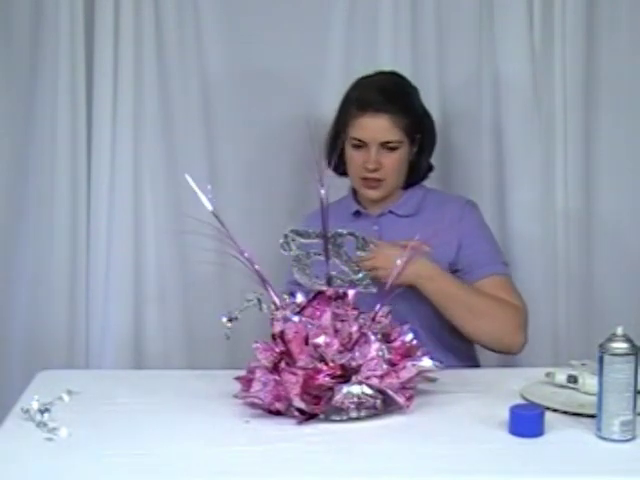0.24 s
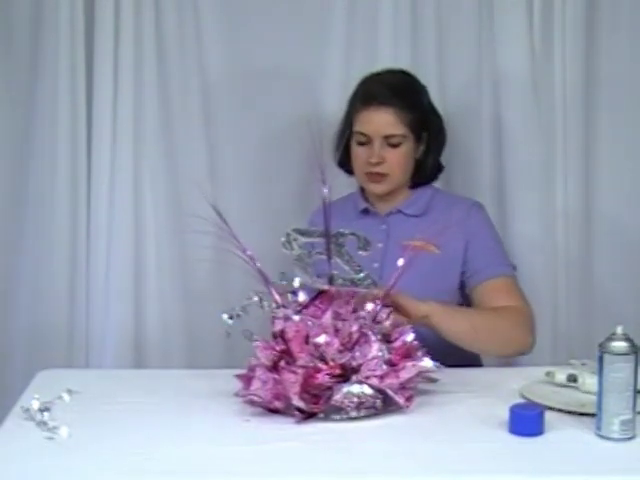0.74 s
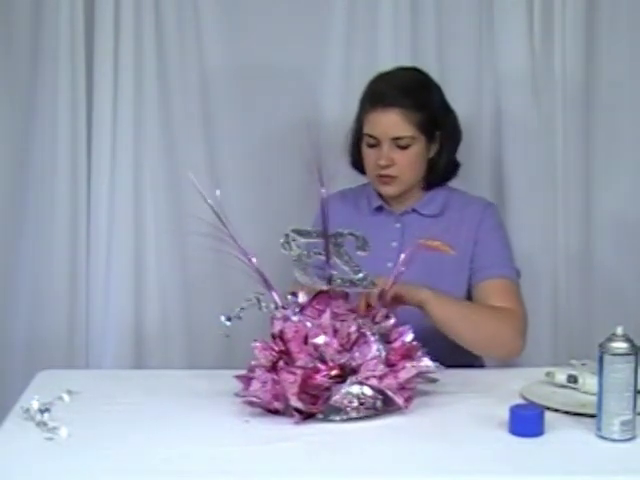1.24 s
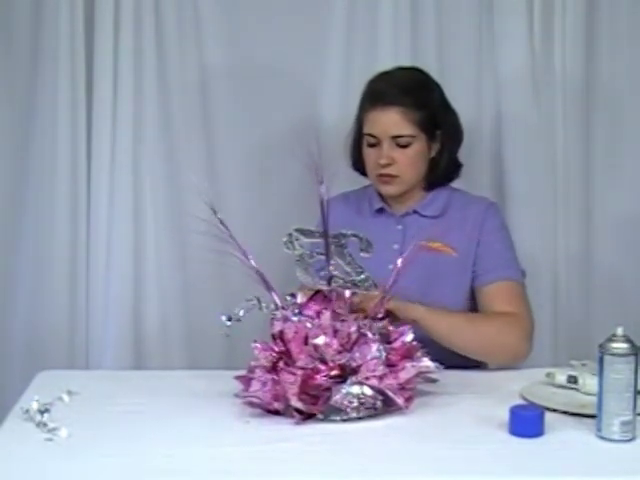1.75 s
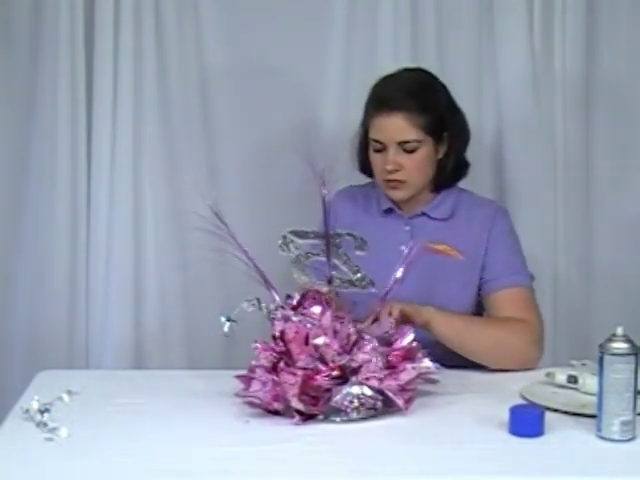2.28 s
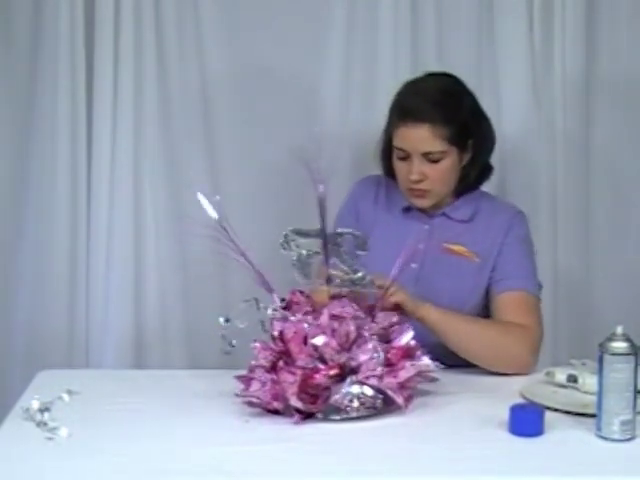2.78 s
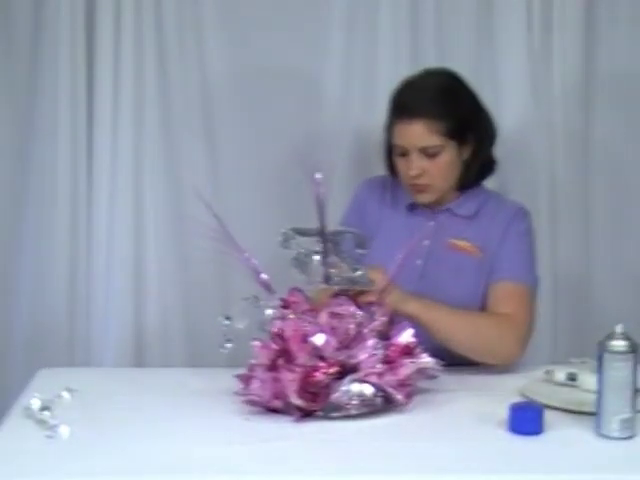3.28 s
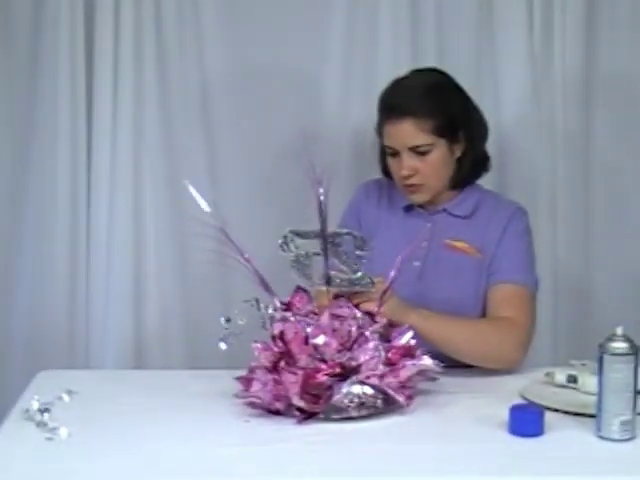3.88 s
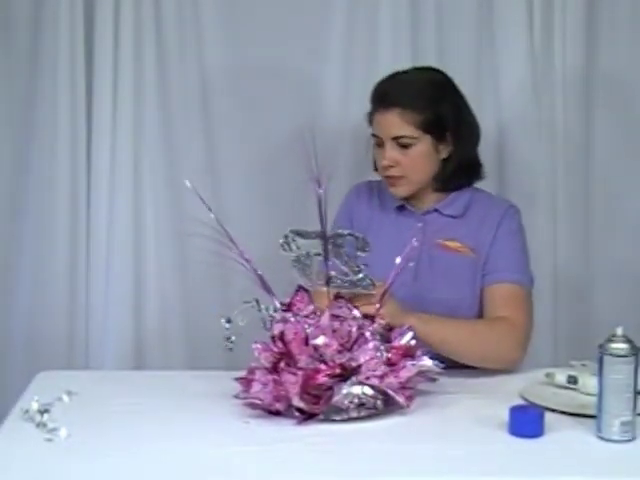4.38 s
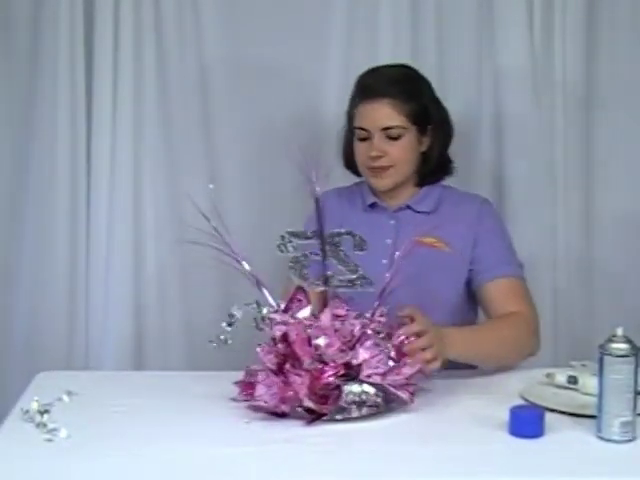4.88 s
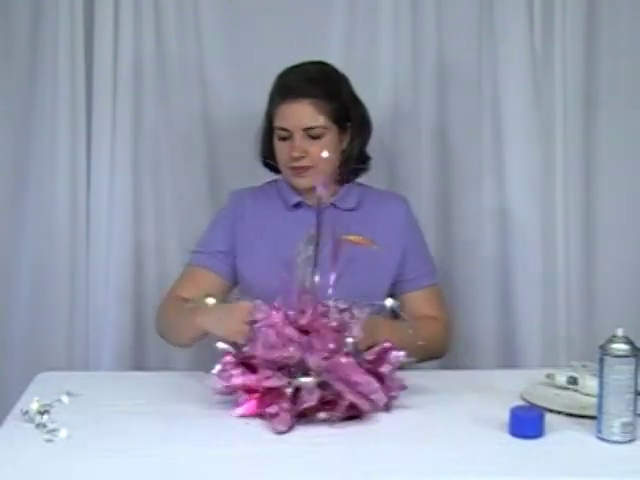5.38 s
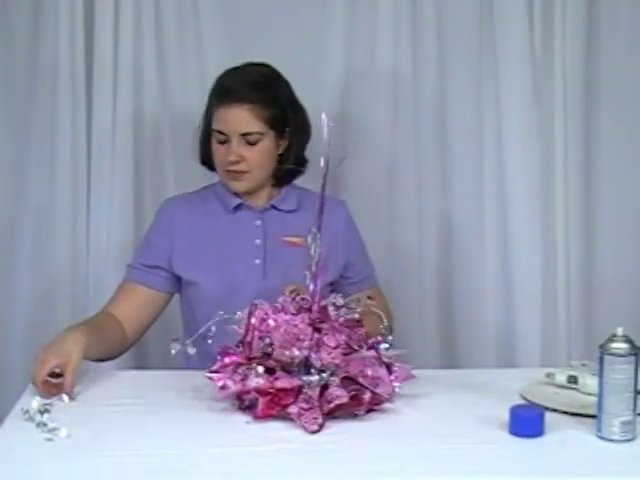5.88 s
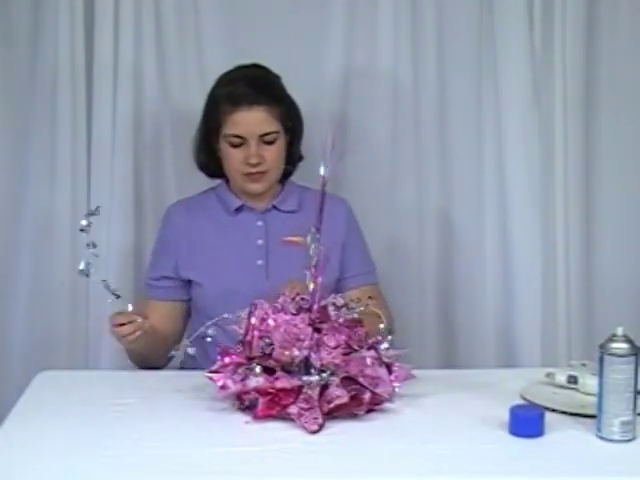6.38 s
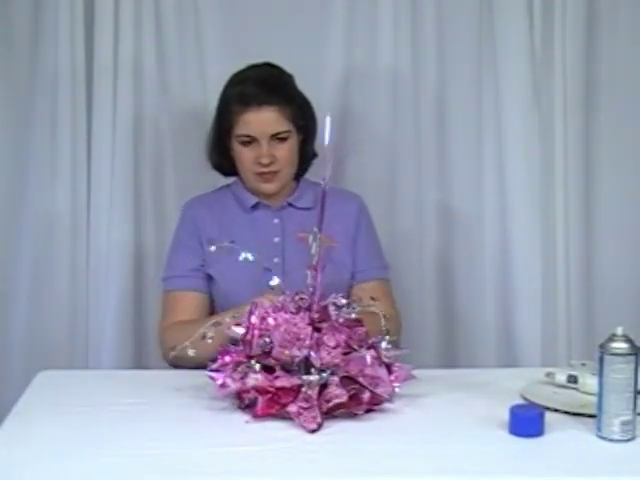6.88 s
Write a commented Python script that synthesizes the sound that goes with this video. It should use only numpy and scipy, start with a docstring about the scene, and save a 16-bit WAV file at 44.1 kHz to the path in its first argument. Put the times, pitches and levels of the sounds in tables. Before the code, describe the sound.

A small indoor room with low hiss, faint electrical buzz and a weak drone. A few metres from the microphone, stiff metallic foil crinkles almost continuously: fine treble ticks, softer lower crumpling, sudden sharp snaps. A louder snap with a soft table bump comes near four seconds, a thick cluster near five, a soft knock and lull near six, then a piercing snap and more rustle.

```python
"""Crumpled foil crackles on a table, a few metres away in a small room, as hands push tinsel sprigs into it.
Small creases tick in the treble, large ones crumple lower, and sharp snaps stand out: all bursts of noise.
A few taps are short fading notes; knocks are table tones with a dull thud of noise.
Behind it lie room tone, a mains buzz, a faint low drone and, in the side channel, microphone hiss."""
import sys
import numpy as np
from scipy import signal
from scipy.fft import rfft, irfft, next_fast_len
from scipy.io import wavfile
from scipy.ndimage import uniform_filter1d, map_coordinates

SR = 44100
rng = np.random.default_rng(int(sys.argv[2]) if len(sys.argv) > 2 else 0)


def digitize_waveform(pressure):
    """Quantize a signal to 16-bit integers and store it at the path in sys.argv[1].

    Rows of a 2-D input are taken as channels; values are limited to [-1, 1].
    """
    field = np.atleast_2d(pressure).T
    bounded = np.clip(field, -1, 1)
    quanta = np.round(bounded * 32767).astype(np.int16)
    wavfile.write(sys.argv[1], SR, quanta)


N = 314874  # length in samples

# All levels in the tables are relative: later gains shift them.
# Room tone in the mid channel: pitch_hz, level_db (per Hz)
AIR_COLOUR = [(15, -49), (25, -16), (111, -13), (230, -6), (399, -3), (606, -4.5), (995, -5), (1080, -5),
              (1400, -7.5), (3670, -14), (7840, -16), (10700, -21.5), (12900, -24)]
# Microphone hiss in the side channel: pitch_hz, level_db (per Hz)
HISS_COLOUR = [(15, -56), (25, -26), (177, -7.5), (208, -3.5), (518, -2.5), (560, -4), (622, -2.5),
               (2620, -15.5), (5160, -24), (11900, -28), (12900, -45)]
# Overtones of the mains buzz: multiple (of the mains pitch), level_db (rms)
BUZZ_OVERTONES = [(4, -71), (10, -75), (12, -73), (14, -75), (16, -74), (18, -70), (44, -81), (58, -80),
                  (59, -78), (61, -78), (63, -75), (64, -82), (69, -81), (72, -82), (80, -81), (83, -77),
                  (94, -79), (132, -80)]
# Overlapping swells of the crackle; some rows together shape one longer push:
# loudest_s, level_db, rise_s, fade_s, large_db (large creases against small ones)
CRACKLE_SWELLS = [(0.24, -57.5, 0.99, 0.43, -17), (0.589, -38.5, 0.061, 0.04, -10.5),
                  (0.69, -40, 0.12, 0.4, -8), (0.97, -40, 0.27, 0.069, -6), (1.11, -40, 0.18, 0.28, -4.5),
                  (1.51, -43, 0.38, 0.091, -6.5), (1.78, -43, 1, 0.27, -7), (1.91, -38, 0.2, 0.12, -4),
                  (2.09, -38, 0.27, .25, -7), (2.23, -37, 0.087, 0.28, -6.5), (2.39, -40.5, 0.23, 0.49, -7),
                  (2.64, -36.5, 0.23, 0.33, -6), (2.94, -48, 0.015, 0.19, 1),
                  (3.079, -42.5, 0.08, 0.12, -2.5), (3.26, -49, 0.27, 0.17, -4),
                  (3.34, -40, 0.072, 0.45, -4), (3.75, -54, 0.38, 0.27, -1.5),
                  (3.84, -31.5, 0.01, 0.14, -4.5), (4.15, -43.5, 0.14, 0.22, -5.5),
                  (4.37, -39.5, 0.014, 0.48, -7), (4.47, -42.5, 0.18, 0.51, -2.5),
                  (4.51, -40.5, .01, 0.14, -6), (4.95, -34.5, 0.084, 0.6, -9), (5.2, -43.5, .5, 0.77, -2),
                  (5.45, -36, 0.73, 0.18, -6), (5.65, -44.5, 0.23, 0.29, -6), (6.02, -54.5, .02, 0.12, 0.5),
                  (6.22, -62, 0.039, 0.042, -9), (6.47, -42, 0.058, 0.16, -9), (6.52, -41, 0.039, 0.12, -8),
                  (6.66, -42.5, 0.18, 0.3, -4.5), (6.79, -39.5, 0.26, 0.38, -5),
                  (6.94, -39.5, 0.58, 0.63, -6.5)]
# Colour of a buckling crease: pitch_hz, level_db (per Hz)
FOIL_COLOUR = [(250, -22.5), (400, -11), (700, -7), (1300, -4.5), (1900, -2.5), (2700, -4.5), (3600, -7.5),
               (5000, -4.5), (6200, -1.5), (7400, -0.5), (8600, -3.5), (10000, -10), (12400, -16.5)]
# Sharp snaps, two of them (at 5.0005 and 6.5237 s) probably echoes of a snap 11 ms earlier:
# start_s, level_db, low_db (low part against the high part), ring_hz
FOIL_SNAPS = [(0.5767, -28, -14, 7900), (0.68, -28, -12, 8080), (0.7058, -18.5, -20, 4840),
              (0.9414, -30.5, -8, 6700), (0.959, -23.5, -15, 7250), (1.0561, -30, -22, 7000),
              (1.475, -27, -17, 7800), (1.495, -23.5, -29, 8600), (1.5557, -22, -30, 5600),
              (1.8037, -29, -27, 7500), (2.0915, -27, -20, 7100), (2.2194, -26, -9, 7200),
              (2.2598, -22.5, -13, 7370), (2.47, -25.5, -14, 6600), (2.64, -30, -18, 7000),
              (2.938, -28.5, -17, 5300), (2.9471, -32, -24, 6900), (3.0445, -34, -23, 7100),
              (3.2032, -28, -20, 9050), (3.3277, -21.5, -36, 5940), (3.354, -36, -19, 6900),
              (3.834, -18.5, -9, 7200), (4.2375, -29, -30, 7560), (4.369, -21, -8, 5360),
              (4.5063, -15.5, -13, 8950), (4.893, -34, -13, 6500), (4.9187, -24, -21.5, 8280),
              (4.9424, -18.5, -17, 7300), (4.9597, -18, -12, 5860), (4.974, -18.5, -28, 8800),
              (4.9894, -15.5, -39, 9200), (5.0005, -21, -25, 7800), (5.0095, -29, -25, 7000),
              (5.0335, -24, -20, 7000), (5.061, -27.5, -18, 6500), (5.1005, -25, -31, 6810),
              (5.161, -29, -22, 7140), (5.7138, -27, -7.5, 7350), (6.011, -31, -8, 8300),
              (6.221, -34, -30, 7500), (6.33, -39, -8, 3700), (6.419, -40, -22, 8300),
              (6.5128, -15, -30, 4360), (6.5237, -20, -26, 6300), (6.6494, -23.5, -3.5, 3780)]
# Small hollow taps, a wire stem on something stiff: start_s, level_db, pitch_hz
STEM_TAPS = [(3.126, -36, 1100), (6.011, -35.5, 1540), (6.515, -28, 4260)]
# Pushes that reach the table: start_s, level_db, tilt_db (per octave, over the table tones),
# thud_db (cloth thud against the tones)
TABLE_KNOCKS = [(3.834, -44, 0, -18), (4.372, -51, -3, -18), (4.506, -53, 6, -15), (5.829, -42, 4, -4)]
# Natural tones of the table top: pitch_hz, level_db, decay_s (to fall 60 dB)
TABLE_MODES = [(100, -17, .15), (188, -2, .3), (250, 0, .26), (282, -4, .2), (345, -10, .15), (385, -5, .2),
               (460, -8, .12), (620, -13, .08)]
# Dull noise of a hand on the cloth: pitch_hz, level_db (per Hz)
THUD_COLOUR = [(60, -37), (200, -6), (330, 0), (600, -7), (1200, -18), (3000, -60)]
# First echoes from the table and nearest walls: delay_s (on average), level_db
FIRST_ECHOES = [(.0028, -4.5), (.0085, -10.5), (0.0113, -8), (.016, -14.5), (.019, -12)]
# How long the room rings: pitch_hz, decay_s (to fall 60 dB)
ROOM_DECAY = [(200, 0.67), (1500, 0.97), (6000, 0.72), (12000, 0.34)]
# Colour of the echoes and room in the side channel: pitch_hz, level_db
SIDE_COLOUR = [(400, -10), (1200, -15), (2100, -23.5), (3800, -15.5), (6900, -15), (8300, -2.5),
               (10000, -5.5), (12400, -9)]

SPLIT_HZ = 2950  # large creases sound mostly below, small ones mostly above
TOP_HZ = 12560  # nothing passes from here up
MAINS_HZ = 59.975
DRONE_HZ, DRONE_DB = 215, -73
SWING_DB = 20  # a swell rises by this much in its rise time and falls by it in its fade time


def amp(db):
    """Turn a level in dB into a gain."""
    return 10 ** (np.asarray(db) / 20)


def unit(x):
    """Scale x to an average (rms) level of 1."""
    return x / np.sqrt(np.mean(x ** 2) + 1e-20)


def along(points, hz):
    """Read a curve of (pitch, value) points, with pitch on a log axis."""
    point_hz, values = np.transpose(points)
    return np.interp(np.log(hz + 1), np.log(point_hz + 1), values)


def wobble(rate):
    """Draw a smooth random curve through rate random points a second."""
    points = rng.standard_normal(int(N * rate / SR) + 4)
    return map_coordinates(points, [np.arange(N) * rate / SR])


def filtered(x, response):
    """Multiply the spectrum of x by a response that depends on pitch."""
    size = next_fast_len(N + SR)
    spectrum = rfft(x, size) * response(np.fft.rfftfreq(size, 1 / SR))
    return irfft(spectrum, size)[..., :N]


def coloured(x, colour):
    """Give x the tone colour of a (pitch, level) table."""
    return filtered(x, lambda hz: amp(along(colour, hz)))


def part(x, low):
    """Keep the part of x under or over the split; the powers of the two parts add up to the whole."""
    def gain(hz):
        low_share = 1 / (1 + (hz / SPLIT_HZ) ** 4)
        return np.sqrt(low_share if low else 1 - low_share)
    return filtered(x, gain)


def background():
    """Steady noise makes room tone and hiss; sines at mains multiples buzz, one more sine drones."""
    t = np.arange(N) / SR
    buzz = np.zeros(N)
    for multiple, db in BUZZ_OVERTONES:
        turns = multiple * MAINS_HZ * t + rng.random()
        buzz += np.sqrt(2) * amp(db) * np.sin(2 * np.pi * turns)
    buzz *= amp(-0.5 + 1.1 * wobble(5.4))
    drone_gain = np.sqrt(2) * amp(DRONE_DB + 0.61 * wobble(4.17))
    drone = drone_gain * np.sin(2 * np.pi * DRONE_HZ * t)
    air = amp(-59.0) * unit(coloured(rng.standard_normal(N), AIR_COLOUR))
    hiss = amp(-54) * unit(coloured(rng.standard_normal(N), HISS_COLOUR))
    return air + buzz + drone, hiss  # mid, side


def swells():
    """Gains of small and large creases: each swell rises and fades, and overlapping swells add in power."""
    loudest_s, db, rise_s, fade_s, large_db = np.transpose(CRACKLE_SWELLS)[..., None]
    t = np.arange(0, N / SR + .002, .002)
    distance = np.where(t < loudest_s, (loudest_s - t) / rise_s, (t - loudest_s) / fade_s)
    swell_db = db - SWING_DB * distance
    gains = []
    for level_db in (swell_db, swell_db + large_db):
        total = np.linalg.norm(amp(level_db), axis=0)
        gains.append(np.interp(np.arange(N) / SR, t, total))
    return gains


def clicks(rate, spread_db, life_s, clump_db):
    """Random buckles, few big and many small: each is a burst of white noise that dies at once."""
    chance, size = rng.random(N), rng.exponential(size=N)
    size_db = spread_db * np.minimum(size, 4.0) + clump_db * wobble(40)
    kicks = (chance < rate / SR) * amp(size_db)
    power = signal.lfilter([1], [1, -np.exp(-1 / (life_s * SR))], kicks ** 2)
    # even out the local level, so that chance clicks make no swells of their own
    local_power = np.abs(uniform_filter1d(power, size=SR // 12)) + 1e-9
    return unit(np.sqrt(power / local_power) * rng.standard_normal(N))


def patchy(x, depth_db):
    """Each crease has its own size, so the colour changes from one cluster of clicks to the next."""
    spectrum = signal.stft(x, nperseg=128)[2]
    field = rng.standard_normal(spectrum.shape)
    field = uniform_filter1d(field, size=4, axis=0)  # smooth over pitch
    field = uniform_filter1d(field, size=5, axis=1)  # smooth over time
    return signal.istft(spectrum * amp(depth_db * unit(field)), nperseg=128)[1][:N]


def foil():
    """Small creases tick in the treble, large ones crumple lower; snaps stand out of both."""
    small_gain, large_gain = swells()
    dense = clicks(rate=1700, spread_db=3.5, life_s=0.0003, clump_db=3.0)
    slower = clicks(rate=500, spread_db=6.0, life_s=0.0017, clump_db=2.0)
    coarse = 0.6 * dense + 0.83 * slower
    small = unit(part(coloured(patchy(dense, depth_db=2.5), FOIL_COLOUR), low=False))
    large = unit(part(coloured(patchy(coarse, depth_db=1.0), FOIL_COLOUR), low=True))
    crackle = amp(-2) * (small_gain * small + large_gain * large)
    return crackle + snaps()


def snaps():
    """Each snap is a noise crack of a few ms with a brief ring at its own pitch, like a buckling facet."""
    high, low = np.zeros(N + SR), np.zeros(N + SR)
    t = np.arange(SR // 20) / SR
    ring_t = t[:128]
    for start_s, db, low_db, ring_hz in FOIL_SNAPS:
        crack = amp(-60 * t / 0.0054) * rng.standard_normal(len(t))
        crack = crack / np.abs(crack).max()
        facet = amp(-60 * ring_t / 0.00093) * np.sin(2 * np.pi * ring_hz * ring_t)
        ring = np.convolve(crack, facet / np.linalg.norm(facet))[:len(t)]
        here = slice(round(start_s * SR), round(start_s * SR) + len(t))
        high[here] += amp(db) * (0.85 * crack + 0.39 * ring)
        low[here] += amp(db + low_db) * crack
    # snaps are brighter than the rustle
    bright = filtered(high[:N], lambda hz: amp(4.9 * np.log2(hz / 6000 + 0.21)))
    high_part = part(coloured(bright, FOIL_COLOUR), low=False)
    low_part = part(coloured(low[:N], FOIL_COLOUR), low=True)
    return amp(8.5) * high_part + amp(22.0) * low_part


def taps():
    """Each tap is one short note that fades by 60 dB in 18 ms."""
    out, t = np.zeros(N + SR), np.arange(SR // 10) / SR
    for start_s, db, pitch_hz in STEM_TAPS:
        note = amp(db - 60 * t / 0.018) * np.sin(2 * np.pi * pitch_hz * t)
        out[round(start_s * SR):][:len(t)] += note
    return out[:N]


def table():
    """A soft push sets the table top booming over a dull thud; both swell over some ms."""
    out, t = np.zeros(N + SR), np.arange(SR // 2) / SR
    dull = unit(coloured(rng.standard_normal(N), THUD_COLOUR))
    onset = (1 - np.exp(-t / 0.0023)) ** 2
    for start_s, db, tilt_db, thud_db in TABLE_KNOCKS:
        start = round(start_s * SR)
        boom = np.zeros(len(t))
        for pitch_hz, mode_db, decay_s in TABLE_MODES:
            # every knock excites the tones a little differently
            level_db = mode_db + tilt_db * np.log2(pitch_hz / 250) + rng.normal(0, 2.4)
            tone = np.sin(2 * np.pi * (pitch_hz * t + rng.random()))
            boom += amp(level_db - 60 * t / decay_s) * tone
        thud = amp(thud_db - 60 * t / 0.4) * dull[start:][:len(t)]
        out[start:][:len(t)] += amp(db) * (boom + thud) * onset
    return out[:N]


def walls(x):
    """The table and nearest walls send back single copies; creases lie apart, so the delays drift."""
    n = np.arange(N)
    drift = .00025 * SR * wobble(25)
    echoes = np.zeros(N)
    for k, (delay_s, db) in enumerate(FIRST_ECHOES):
        direction = (-1) ** k  # neighbouring echoes drift opposite ways
        echoes += amp(db) * map_coordinates(x, [n - delay_s * SR + direction * drift])
    return echoes


def room(x):
    """Fading noise smears x into mid and side reverb; each eighth of a second meets a fresh tail."""
    step, out = SR // 8, np.zeros((2, N + 2 * SR))
    noise = rng.standard_normal((N // step + 1, 2, SR // 2))
    hz, t, spectrum = signal.stft(noise, SR, nperseg=128, noverlap=32)
    decay = amp(-60 * t / along(ROOM_DECAY, hz)[:, None])
    tails = signal.istft(spectrum * decay, SR, nperseg=128, noverlap=32)[1]
    for k, tail in enumerate(tails):
        piece = x[None, k * step:][:, :step]
        answer = signal.fftconvolve(piece, tail / np.linalg.norm(tail[0]), axes=1)
        # the diffuse sound comes late, by 400 samples
        out[:, k * step + 400:][:, :answer.shape[1]] += answer
    return out[:, :N]


def scene():
    """The foil sits straight ahead; only echoes, room and hiss reach the side channel."""
    near = foil() + table() + taps()
    early = walls(near)
    wet_mid, wet_side = room(near)
    air, hiss = background()
    mid = amp(-4.0) * (near + early) + amp(-5.0) * wet_mid + air
    side = coloured(wet_side + 0.42 * walls(near), SIDE_COLOUR) + hiss
    left_right_db = [[-.3], [.3]]
    return np.array([mid + side, mid - side]) * amp(left_right_db)


def record(dry):
    """Cut everything from the band limit up."""
    return filtered(dry, lambda hz: hz < TOP_HZ)


dry = scene()
out = record(dry)
digitize_waveform(out)
```